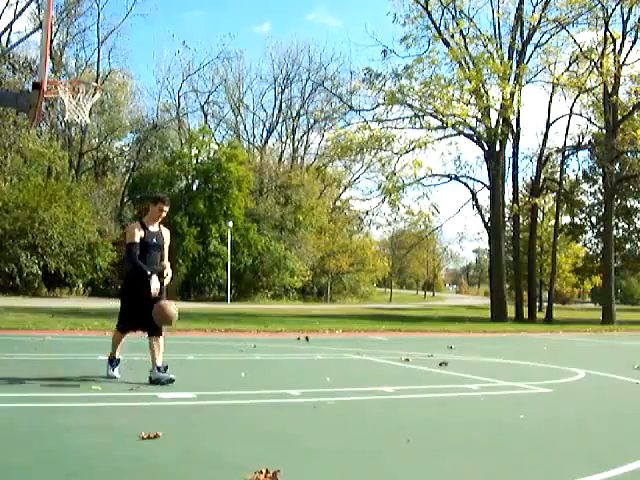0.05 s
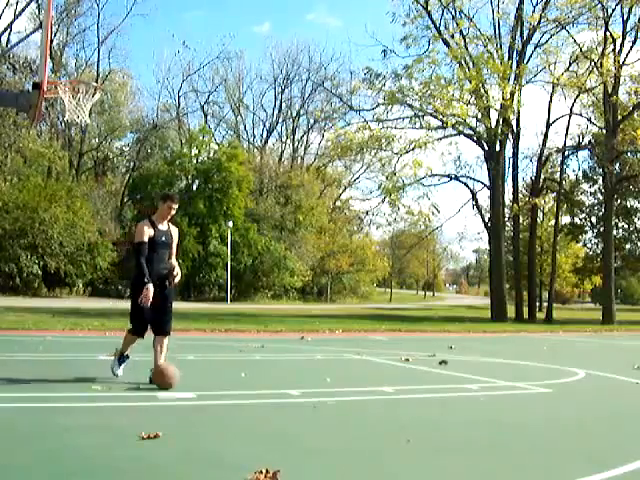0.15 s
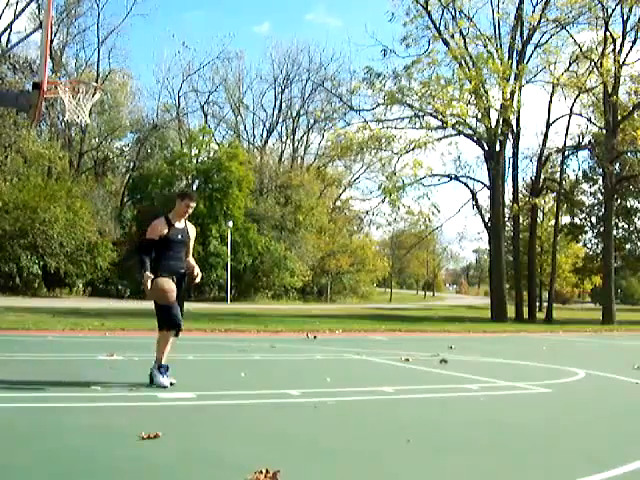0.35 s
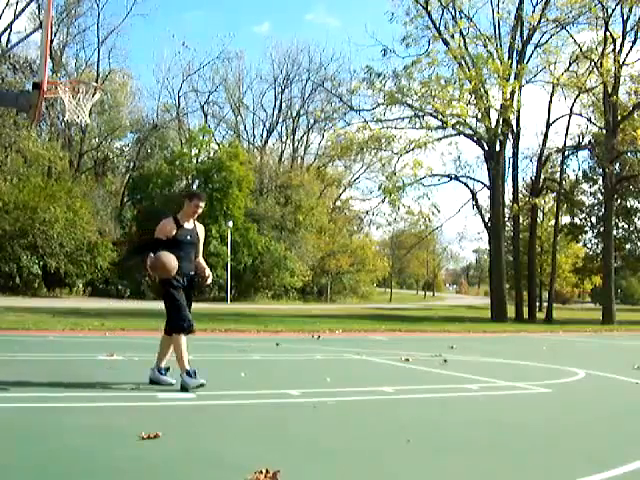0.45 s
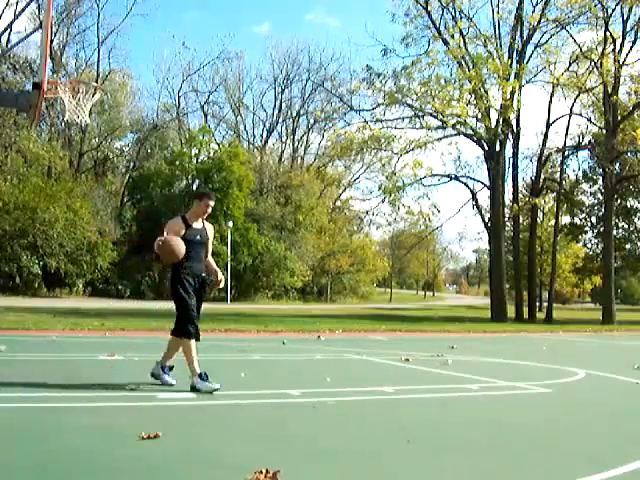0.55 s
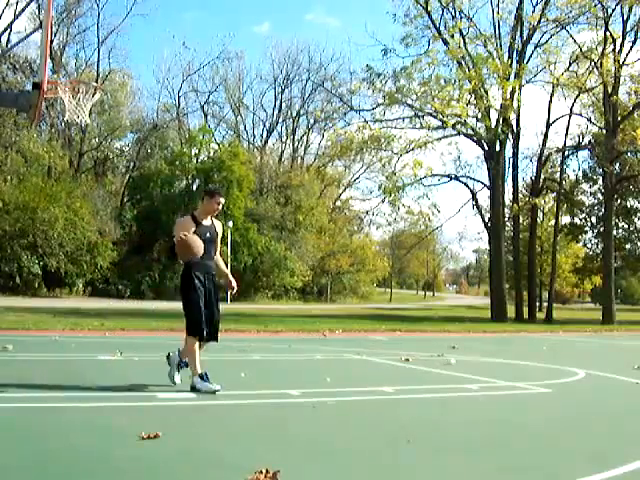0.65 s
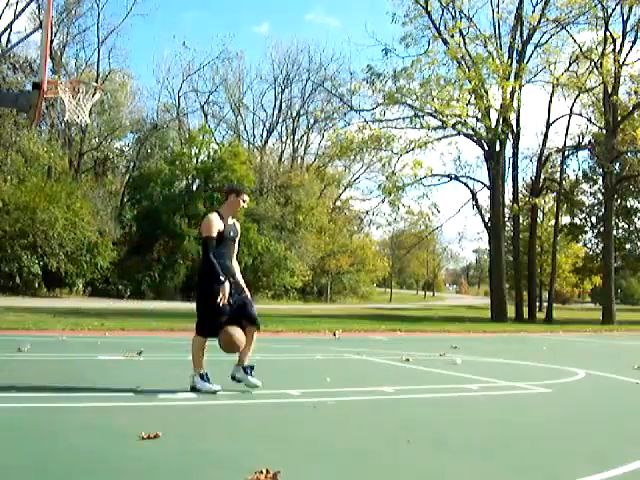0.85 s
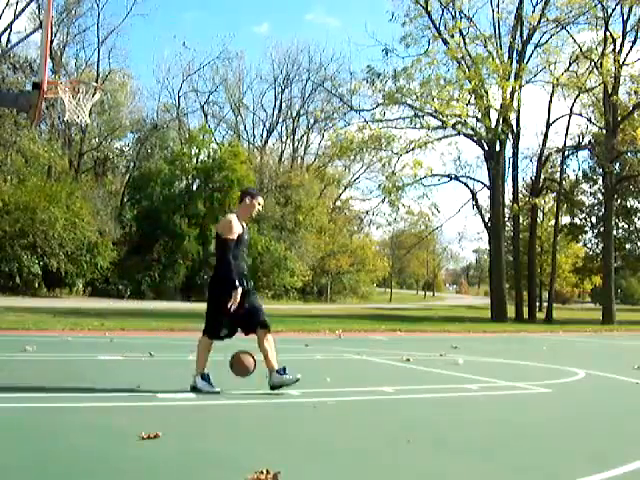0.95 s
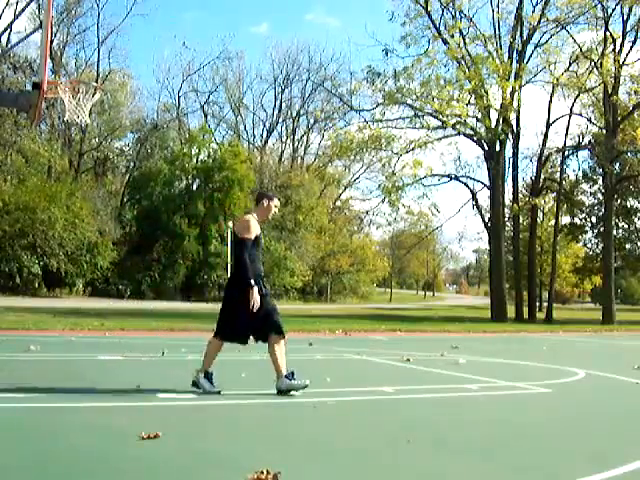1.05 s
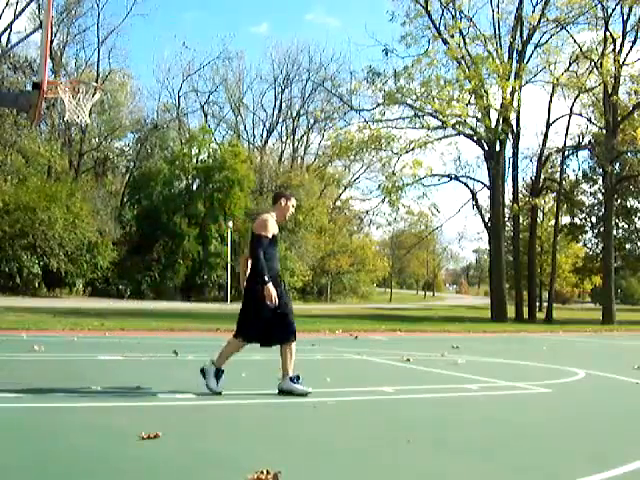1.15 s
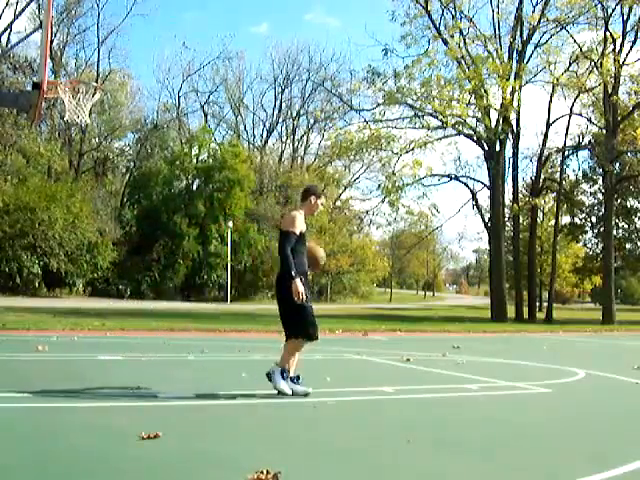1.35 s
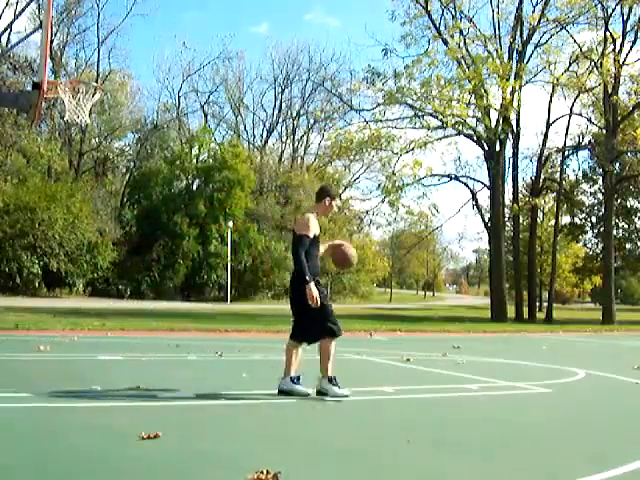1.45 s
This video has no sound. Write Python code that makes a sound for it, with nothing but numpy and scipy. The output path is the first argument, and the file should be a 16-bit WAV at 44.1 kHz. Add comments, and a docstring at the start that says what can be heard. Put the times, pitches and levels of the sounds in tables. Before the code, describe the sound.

A basketball bounces twice on a hard outdoor court, with faint shoe scuffs and light wind.

```python
"""Basketball on an outdoor court

A basketball is dribbled twice on a hard court while the player walks, shoes scuffing the surface. Each bounce
sums a slap heard twice in quick succession, a thump of falling pitch, damped shell and air modes, and a lift-
off tick. Shoes are filtered random clicks; wind rumble, the steady hiss of trees and a brief rustle are shaped
noise. A gain control ducks after loud peaks, then overload clips and the top is cut."""
import sys
import numpy as np
from scipy import signal
from scipy.fft import rfft, irfft
from scipy.io import wavfile

SR = 44100
rng = np.random.default_rng(int(sys.argv[2]) if len(sys.argv) > 2 else 0)


def inscribe(sig):
    """Save sig as 16-bit PCM at rate SR to the path in sys.argv[1].

    A 1-D sig is mono; a 2-D sig holds one channel per row.
    Samples are clipped to [-1, 1] before scaling.
    """
    pcm = np.round(np.clip(np.atleast_2d(sig).T, -1, 1) * 32767)
    wavfile.write(sys.argv[1], SR, pcm.astype(np.int16))


N = 66150
T = np.arange(N) / SR   # time in seconds

# Impacts of the ball. Each row: start in seconds, slap level in dB, thump level in dB, thump start pitch in Hz,
# shell level in dB, crack level in dB, crack pitch in Hz, lift-off level in dB, lift-off pitch in Hz,
# delay of the second slap in seconds, level of the second slap in dB re the first.
BOUNCES = [(0.2112, 4.5, 1.5, 159.7, -13, -9.5, 3300, -16, 1110, 0.000346, 5.5),
           (0.9807, -7, -2.5, 116, -20, -3, 2820, -16, 1585, 0.000792, -10.5)]
# Modes of the rubber shell. Each row: frequency in Hz, level in dB, t60 in seconds.
SHELL_MODES = [(278, -4.5, 0.064), (491, -14, 0.11), (572, -12, 0.05), (716, 2.5, 0.027), (860, -2, 0.037),
               (939, 0, .045), (1207, 2, 0.011), (1328, 2.5, 0.016)]
# Resonance of the air inside the ball. Each row: frequency in Hz, level in dB, t60 in seconds.
AIR_MODES = [(1005, -14.5, .17)]
# Crack of the pebbled skin. Each row: frequency as a ratio to the crack pitch, level in dB, t60 in seconds.
CRACK_MODES = [(1, 0.5, 0.0024), (1.68, -4, 0.0014), (2.1, 3.5, 0.0013), (2.6, 0.5, 0.0015)]
# Dragging soles. Each row: middle in seconds, half length (to 1/e) in seconds, level in dB, centre in Hz.
SCUFFS = [(0.019, 0.0072, -38, 3300), (0.11, .045, -45.5, 2550), (0.174, 0.013, -34, 2590),
          (0.209, 0.0073, -35.5, 3770), (0.406, 0.0032, -46, 4860), (0.453, 0.0078, -34.5, 2900),
          (.524, 0.027, -40.5, 3020), (0.565, 0.0056, -40, 4000), (0.718, 0.0083, -41, 3350),
          (0.94, 0.15, -46.5, 3500), (1.184, 0.0084, -36.5, 3070), (1.302, 0.014, -42, 2800),
          (1.398, 0.007, -36.5, 3060)]
# Soles touching down. Each row: start in seconds, level in dB, centre in Hz.
TAPS = [(0.443, -36.5, 3000), (0.49, -34, 2600), (1.175, -32, 3420), (1.325, -42, 2780), (1.369, -35, 1940)]
# Wind buffets. Each row: middle in seconds, half length (to 1/e) in seconds, level in dB.
BUFFETS = [(0.027, 0.031, -34.5), (0.286, 0.06, -34.5), (0.564, 0.078, -33), (0.845, 0.033, -19.5),
           (1.025, 0.013, -25.5), (1.182, 0.023, -38), (1.288, 0.016, -29)]
# Spectra of buffets, wind rumble, tree hiss and rustle. Each row: frequency in Hz, relative density in dB.
BUFFET_COLOUR = [(15, -5.5), (35, -6), (60, 0.5), (120, -15), (220, -25), (400, -43), (1000, -71)]
RUMBLE_COLOUR = [(15, -3.5), (28, -6.5), (62, -0.5), (100, -5.5), (160, -15.5), (270, -16.5), (400, -30.5),
                 (1000, -72.5)]
HISS_COLOUR = [(100, -32.5), (300, 0), (650, 3), (1200, -2.5), (2000, -2), (3000, -3.5), (5000, -5.5),
               (7500, -12), (9000, -46)]
RUSTLE_COLOUR = [(60, -5), (200, 2.5), (700, -5), (1500, -8.5), (4000, -11.5), (8000, -23)]
# Level curve of the rustle at the start. Each row: time in seconds, level in dB.
RUSTLE_LEVEL = [(0, -39.5), (.1, -39.5), (.19, -38), (.23, -56), (.3, -82.5)]

CONTACT_S = 0.0142   # the ball stays on the ground this long
SLAP_DECAY_S, SLAP_EDGE_HZ = 0.00016, 5900
THUMP_END_HZ, THUMP_SAG_S, THUMP_DECAY_S, THUMP_ATTACK_S = 66, 0.0051, 0.0072, 0.0015
RELEASE_DB, RELEASE_LEAD_S, RELEASE_WIDTH_S = -10, 0.00099, 0.00061   # level re the thump
SCATTER_DB, SCATTER_DECAY_S, SCATTER_HZ = -4, 0.0097, 1200   # unused: the scatter plays at unit rms under the shell level
LIFT_DECAY_S, LIFT_ATTACK_S = 0.0019, 0.0001
PEEL_DB, PEEL_DECAY_S, PEEL_LOW_HZ, PEEL_HIGH_HZ = -13.5, 0.005, 710, 2630   # level re the lift-off tick
GRIT_PER_S, GRIT_SPREAD_DB = 6000, 5.5
GRIT_BAND_RATIO = 1.353   # band edges lie at centre / ratio and centre * ratio
EDGE_DB, EDGE_HZ = -5, 5920   # bright edge, level re the rasp
TAP_DECAY_S = 0.004
RUMBLE_DB, HISS_DB = -36.5, -44.5
AGC_THRESHOLD_DB, AGC_ATTACK_S = -4, 0.011
AGC_SHARE = 0.26   # dB of gain reduction per dB of held excess
EXCESS_FALL_DB_PER_S = 25
CLIP_LEVEL, CUTOFF_HZ = 0.86, 7900


def bounce(s, slap_db, thump_db, thump_hz, shell_db, crack_db, crack_hz, lift_db, lift_hz, second_s, second_db):
    """Impact of an elastic shell: a doubled slap, sagging thump, modal ringing, spring-back and lift-off."""
    leave = s + CONTACT_S
    slaps = slap(s, slap_db, crack_db, crack_hz) + from_db(second_db) * slap(
        s + second_s, slap_db, crack_db, crack_hz)
    release = from_db(RELEASE_DB) * swell(leave - RELEASE_LEAD_S, RELEASE_WIDTH_S)   # flat spot springs back
    squash = from_db(thump_db) * (thump(s, thump_hz) + release)
    shell = from_db(shell_db) * (ring(SHELL_MODES + AIR_MODES, s) + court_scatter(s))
    return from_db(lift_db) * lift_off(leave, lift_hz) - butter(slaps, SLAP_EDGE_HZ, "low") - squash - shell


def slap(start, slap_db, crack_db, crack_hz):
    """Impulsive contact: a very short pressure pulse with the damped modes of the pebbled skin."""
    crack = [(ratio * crack_hz, db, t60) for ratio, db, t60 in CRACK_MODES]
    return from_db(slap_db) * decay(start, SLAP_DECAY_S) + from_db(crack_db) * ring(crack, start)


def thump(start, start_hz):
    """Damped oscillation of the squashed ball, its frequency relaxing exponentially to a lower value."""
    age = np.maximum(T - start, 0)
    # The phase in turns is the integral of the falling frequency.
    sag_turns = (start_hz - THUMP_END_HZ) * THUMP_SAG_S * (1 - np.exp(-age / THUMP_SAG_S))
    turns = THUMP_END_HZ * age + sag_turns
    return np.cos(2 * np.pi * turns) * decay(start, THUMP_DECAY_S) * (1 - decay(start, THUMP_ATTACK_S))


def court_scatter(start):
    """Diffuse scattering: a dull wash of the court, as low-passed noise that decays exponentially."""
    wash = rms_one(butter(rng.standard_normal(N), SCATTER_HZ, "low"))
    return wash * decay(start, SCATTER_DECAY_S)


def lift_off(s, hz):
    """Release of contact: a short damped tick, with band noise for the skin peeling off the court."""
    tick = np.sin(2 * np.pi * hz * (T - s)) * decay(s, LIFT_DECAY_S)
    rasp = rms_one(butter(rng.standard_normal(N), [PEEL_LOW_HZ, PEEL_HIGH_HZ], "band"))
    peel = rasp * decay(s, PEEL_DECAY_S)
    return (tick + from_db(PEEL_DB) * peel) * (1 - decay(s, LIFT_ATTACK_S))


def shoes():
    """Friction and impact of soles: grit noise under soft swells for drags and sudden decays for taps."""
    scuffs = sum(from_db(db) * swell(middle, half) * grit(hz) for middle, half, db, hz in SCUFFS)
    taps = sum(from_db(db) * decay(s, TAP_DECAY_S) * grit(hz) for s, db, hz in TAPS)
    return scuffs + taps


def grit(hz):
    """Granular friction: dense random clicks of uneven size, filtered to a rasp with a bright edge."""
    sizes = from_db(GRIT_SPREAD_DB * np.minimum(rng.exponential(1, N), 4))
    signs = rng.choice([-1, 1], N)
    clicks = sizes * signs * (rng.random(N) < GRIT_PER_S / SR)
    rasp = rms_one(butter(clicks, [hz / GRIT_BAND_RATIO, hz * GRIT_BAND_RATIO], "band"))
    edge = rms_one(butter(clicks, [EDGE_HZ / GRIT_BAND_RATIO, EDGE_HZ * GRIT_BAND_RATIO], "band"))
    return rasp + from_db(EDGE_DB) * edge


def wind():
    """Turbulent pressure on the microphone: steady low-frequency noise with a few stronger buffets."""
    gusts = sum(from_db(db) * swell(middle, half) for middle, half, db in BUFFETS)
    return from_db(RUMBLE_DB) * noise(RUMBLE_COLOUR) + gusts * noise(BUFFET_COLOUR)


def background():
    """Stationary broadband noise for the hiss of trees, and a soft rustle that fades near the start."""
    rustle_gain = from_db(np.interp(T, *np.transpose(RUSTLE_LEVEL)))
    return from_db(HISS_DB) * noise(HISS_COLOUR) + rustle_gain * noise(RUSTLE_COLOUR)


def ring(modes, start):
    """Modal superposition: damped sines struck together."""
    return sum(from_db(db) * np.sin(2 * np.pi * hz * (T - start)) * decay(start, t60 / np.log(1000))
               for hz, db, t60 in modes)


def noise(colour):
    """Spectral shaping: white noise weighted in frequency, then scaled to unit rms."""
    hz, db = np.transpose(colour)
    bins = np.maximum(np.fft.rfftfreq(N, 1 / SR), 1)
    gains = from_db(np.interp(np.log(bins), np.log(hz), db))
    return rms_one(irfft(rfft(rng.standard_normal(N)) * gains, N))


def swell(middle, half):
    """Gaussian envelope, falling to 1/e at the half length."""
    return np.exp(-((T - middle) / half) ** 2)


def decay(start, tau):
    """Exponential relaxation after a sudden start, with time constant tau in seconds."""
    return (T >= start) * np.exp(-np.maximum(T - start, 0) / tau)


def butter(x, hz, kind, order=2):
    """Causal Butterworth filter, maximally flat in its passband."""
    sections = signal.butter(order, np.clip(hz, 10, .45 * SR), kind, fs=SR, output="sos")
    return signal.sosfilt(sections, x + 1e-18)


def rms_one(x):
    """Normalisation of signal power to unit rms."""
    return x / np.sqrt(np.mean(x ** 2) + 1e-20)


def from_db(db):
    """Logarithmic level in decibels to amplitude gain."""
    return 10 ** (np.asarray(db) / 20)


def scene():
    """Linear superposition of ball, shoes and open air at one microphone."""
    ball = sum(bounce(*row) for row in BOUNCES)
    return (ball + shoes() + wind() + background())[None]


def record(dry):
    """Dynamic compression with slow recovery, then hard clipping and a steep elliptic low-pass."""
    excess = np.maximum(20 * np.log10(np.abs(dry[0]) + 1e-9) - AGC_THRESHOLD_DB, 0)
    fall = EXCESS_FALL_DB_PER_S * T
    held = np.maximum.accumulate(excess + fall) - fall   # peak hold falling linearly in dB
    memory = np.exp(-1 / (AGC_ATTACK_S * SR))
    smoothed = signal.lfilter([1 - memory], [1, -memory], held)
    ducked = dry * from_db(-AGC_SHARE * smoothed)
    clipped = np.clip(ducked, -CLIP_LEVEL, CLIP_LEVEL)
    top_cut = signal.ellip(8, .3, 65, CUTOFF_HZ, fs=SR, output="sos")   # ripple and stopband in dB
    return signal.sosfilt(top_cut, clipped)


dry = scene()
out = record(dry)
inscribe(out)
```